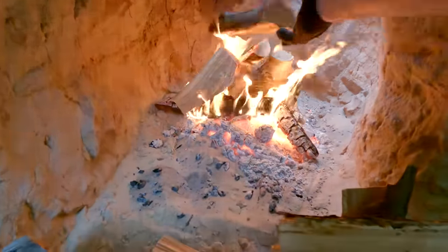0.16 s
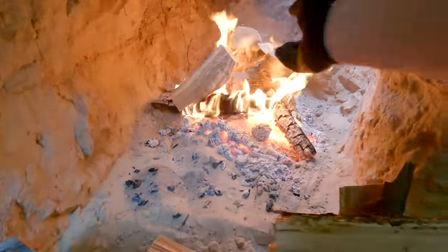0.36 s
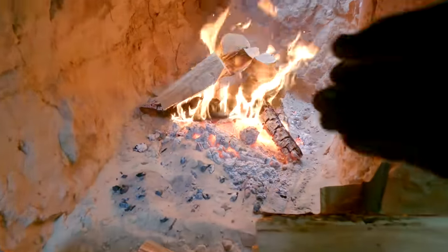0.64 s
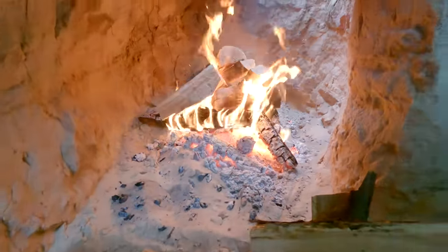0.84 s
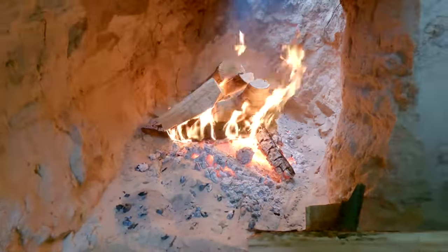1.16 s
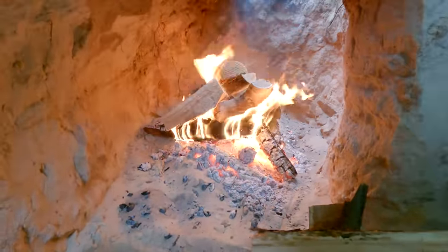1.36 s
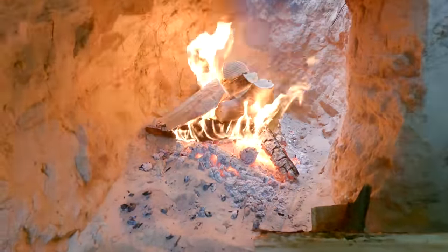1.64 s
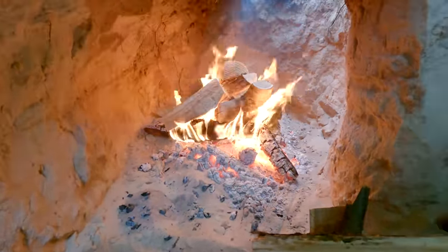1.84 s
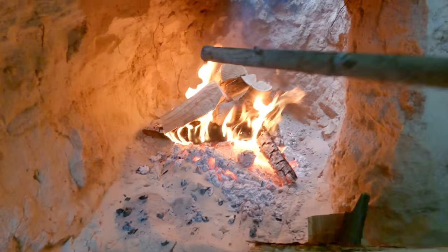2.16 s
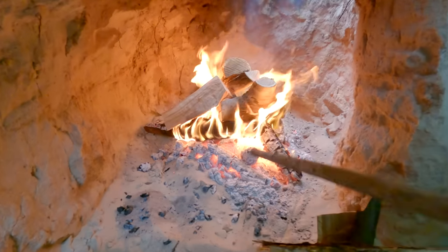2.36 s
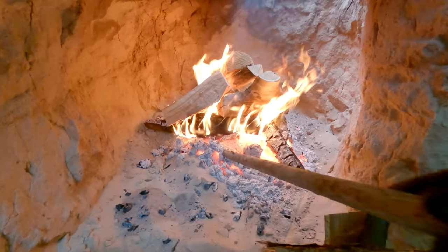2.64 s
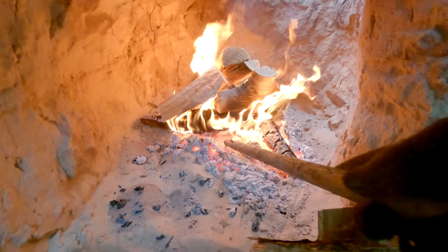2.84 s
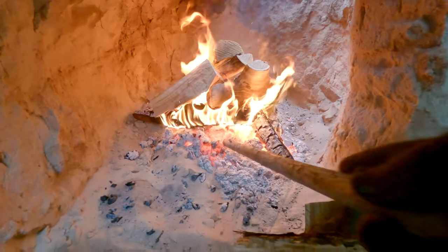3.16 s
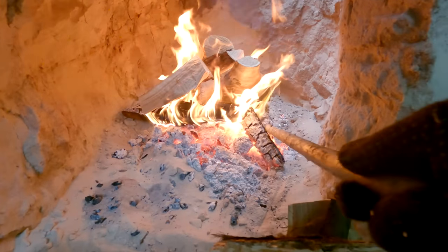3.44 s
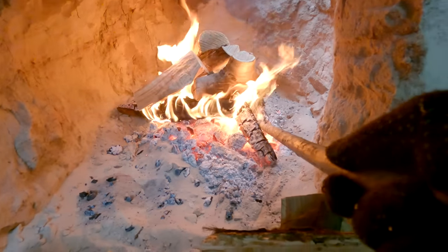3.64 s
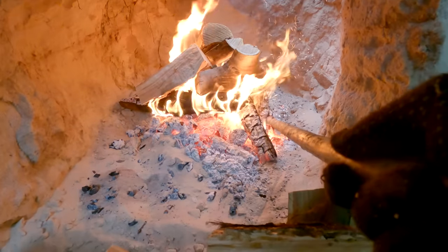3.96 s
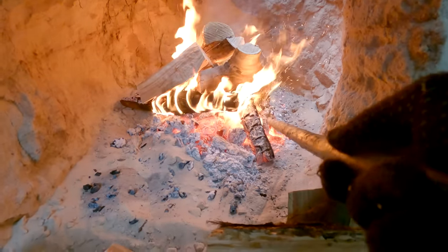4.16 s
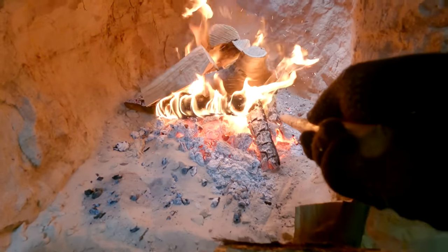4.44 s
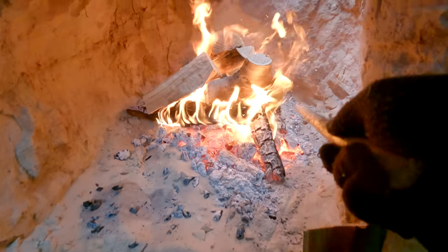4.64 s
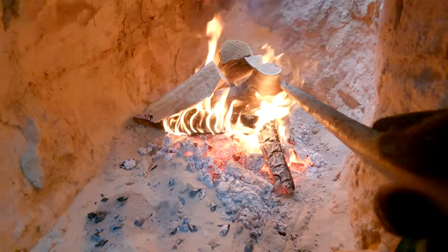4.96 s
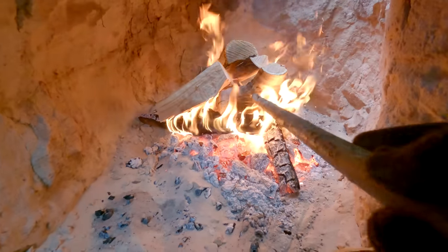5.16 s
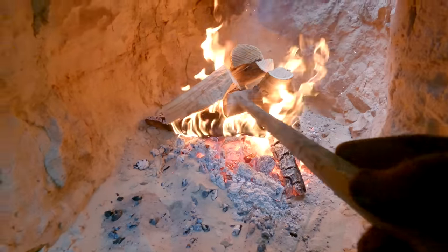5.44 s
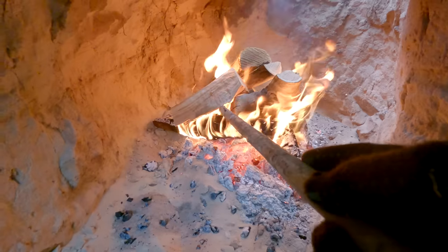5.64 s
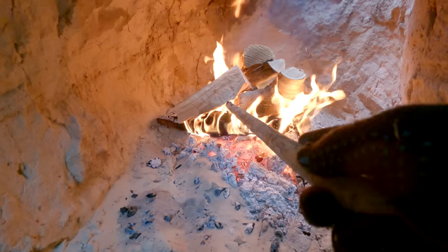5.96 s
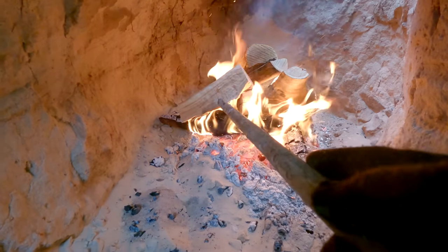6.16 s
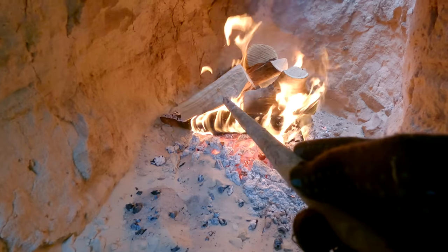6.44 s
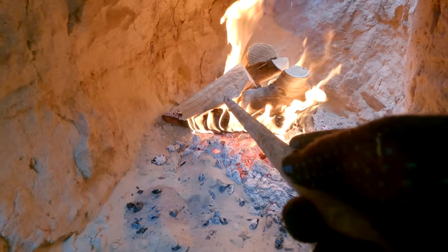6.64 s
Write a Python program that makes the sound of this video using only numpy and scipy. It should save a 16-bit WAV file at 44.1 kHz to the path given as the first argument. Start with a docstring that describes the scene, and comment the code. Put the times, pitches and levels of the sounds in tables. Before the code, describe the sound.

A wood fire burns in a clay fireplace, heard close to the hearth. Sharp, irregular pops and snaps sound over a low, fluttering flame rumble and a faint sizzle. Right at the start a log lands with a dull knock and a rasp of charcoal. Later a stick stirs the embers with small gritty scrapes and a few softer wooden knocks. Three puffs of burning gas thump low along the way, and the crackling continues to the end.

```python
"""A wood fire in a clay fireplace, one microphone close to the hearth.
From the start the flames rumble in the hollow, sap sizzles and wood cells burst as pops and snaps.
At 0.3 s a new log knocks down and charcoal rasps; near 1.9 s a puff of burning gas thumps the hearth.
Embers rustle as they are stirred with a stick, and from 3.7 to 4.8 s wood knocks on wood again.
Two stronger puffs come at 4.2 and 5.9 s, and the fire crackles on to the end."""
import sys
import numpy as np
from scipy import signal
from scipy.fft import rfft, irfft
from scipy.io import wavfile
from scipy.ndimage import uniform_filter1d

SR = 44100
rng = np.random.default_rng(int(sys.argv[2]) if len(sys.argv) > 2 else 0)


def master_out(mix):
    """Clip the mix to full scale and print it as 16-bit PCM to the path in sys.argv[1]."""
    frames = np.transpose(np.atleast_2d(mix))
    ceiling = np.clip(frames, -1, 1)
    pcm = np.round(ceiling * 32767).astype(np.int16)
    wavfile.write(sys.argv[1], SR, pcm)


N = 299880


def pops():
    """Wood cells burst with a snap, the split wood rings, and a wash returns from the clay walls."""
    # bursting wood cells; the three bands are relative to 3200 Hz: (time [s], nominal peak [dB],
    # body at 500 Hz [dB], wood at 1400 Hz [dB], edge at 7500 Hz [dB], ring of the split wood [Hz])
    bursts = [(0.033, -43, -32, -12, -6, 1420), (0.131, -34, -29, -16, -15, 2800),
              (0.159, -37, -31, -16, -13, 3120), (0.29, -18.5, -1, -21, -23, 2220),
              (0.324, -28.5, -28, -23, -30, 1930), (0.35, -17.5, -40, -19, -36, 3630),
              (0.378, -20.5, -8, -36, -30, 3820), (0.45, -30.5, -19, -40, -29, 3720),
              (0.47, -30.5, -15, -29, -25, 2670), (0.609, -34, -30, -15, -13.5, 3240),
              (0.631, -32.5, -33, -14, -17, 1430), (0.664, -40.5, -24, -21, -6, 3620),
              (0.942, -39.5, -15, -21, -13, 1000), (0.953, -37.5, -8, -21, -15, 1120),
              (1.059, -47.5, -10, -15, 1, 7160), (1.099, -43, -8, -4, -2, 1290),
              (1.148, -39.5, -11, -8, -11, 1930), (1.245, -22, -14, -10, -13, 1300),
              (1.452, -40, -25, -16, -15, 1630), (1.514, -13, -21, -14, -18, 2780),
              (1.576, -12.5, -23, -2.5, -2, 4200), (1.608, -30, -17, -14, -23, 1310),
              (1.665, -37, -13, -26, -16.5, 7300), (1.785, -35.5, -27, -18, -14, 1160),
              (1.841, -22.5, -23, -24, -12.5, 7600), (1.854, -15, -22.5, -16.5, -13, 3780),
              (1.981, -41.5, -11, -6, -5, 1180), (2.006, -30, -15, -9.5, -12, 1510),
              (2.052, -25, -6.5, -12.5, -15.5, 3120), (2.132, -33.5, -16, -14.5, -19, 1270),
              (2.15, -37.5, -19, -14, -34, 2730), (2.224, -21, -19, -11, -12, 3900),
              (2.333, -21, -19.5, -17, -19.5, 2800), (2.422, -37.5, -39, -19, -22, 1620),
              (2.513, -13.5, -18, -13, -13, 5590), (2.568, -39, -25, -21, -31, 1650),
              (2.596, -41, -9, -18, -18, 1120), (2.735, -21, -14.5, -15, -12.5, 1260),
              (2.858, -36, -34, -13, -28, 2930), (3.033, -33, -18, -9, -7, 3400),
              (3.068, -32.5, -15, -14, -35, 1680), (3.325, -46, -21, -3, -35, 1090),
              (3.379, -24, -13.5, -8.5, -13.5, 3920), (3.424, -29.5, -18, -15, -10, 3700),
              (3.47, -35, -4, -15, -21, 1630), (3.503, -38, -15, -20, -17, 4080),
              (3.532, -28, -17, -12, -15, 2600), (3.538, -31.5, -18.5, -12, -10, 3770),
              (3.627, -26, -21, -17, -11.5, 6160), (3.67, -30.5, -5, -26, -18, 2360),
              (3.698, -25.5, -18, -7, -16, 2760), (3.711, -25.5, -20, -15, -19, 1100),
              (3.738, -20.5, -5, -7.5, -14, 1030), (3.797, -31.5, -15, -15, -16.5, 1110),
              (3.835, -40, -7, -9, -18, 1180), (3.854, -32.5, -8, -7, -16, 2460),
              (3.955, -18, -3, 2, -15, 1020), (3.961, -26, -19, -19, -6, 2750),
              (4.15, -21, 0, 0, -21, 1020), (4.172, -30.5, -4, -13, -21, 1710),
              (4.218, -12.5, -20.5, -11.5, -17.5, 2470), (4.238, -11, -16, -7, -25, 1360),
              (4.255, -26, -18, -11, -37, 2270), (4.266, -29.5, -10, -13, -22, 2430),
              (4.328, -28.5, -19, 2, -9, 1110), (4.429, -34.5, -35, 0, -3, 3360),
              (4.471, -36, -6, -12, -7, 3700), (4.681, -31, -0.5, -17, -32, 1160),
              (4.779, -20.5, -23, -21, -11, 2250), (4.791, -25, -10, -22, -8, 2150),
              (4.811, -12.5, -7.5, -7.5, -11, 3440), (4.893, -35.5, -12, -15, -31, 1050),
              (4.949, -21.5, -11, -7, -12.5, 1100), (4.969, -26.5, -17, -23, -14.5, 1860),
              (4.995, -31.5, -8, -9, -8, 3240), (5.088, -33.5, -13, -7, -15, 2100),
              (5.11, -29.5, -8.5, -6, -3.5, 3600), (5.181, -22, -10, -7, -16, 3400),
              (5.386, -27, -16, -40, -9, 6000), (5.524, -21.5, -11.5, 0, -10, 1130),
              (5.85, -10, -47, -8.5, -7, 2630), (5.937, -21.5, -26.5, -26, -13.5, 4940),
              (5.944, -22.5, -37, -16, -6.5, 3500), (5.975, -32, -45, -23, -13, 6870),
              (6.038, -38, -24, -19, -8, 4060), (6.062, -31.5, -24, -20, -27, 1350),
              (6.137, -38.5, -18, -39, -15, 1010), (6.193, -25.5, -11, -18, -16, 6100),
              (6.215, -11.5, -12.5, -13, -7, 1140), (6.334, -38.5, -19, -25, -4, 7400),
              (6.366, -18.5, -13.5, -11.5, -9.5, 2700), (6.432, -36.5, -31, -8, -9, 1160),
              (6.615, -32.5, -23, -38, -14, 5140), (6.629, -38, -12, -13, -13, 1000),
              (6.655, -24.5, -25, -14.5, -12.5, 5160), (6.736, -39.5, -24, -31, -13, 4090),
              (6.776, -31.5, -11, -20, -8, 3450)]
    # colour of the fireplace and microphone on every pop: (frequency [Hz], gain [dB])
    colour = [(90, -29.5), (200, 21), (500, 19.5), (800, 17.5), (950, 7.5), (1150, 14.5), (1700, 9.5),
              (2770, 0), (4000, 2), (5500, 4.5), (7500, 9), (9000, -1), (11500, -6.5), (13000, -16.5),
              (15500, -14.5)]
    split_t60_s, wall_t60_s, wall_db = .016, .075, -14
    lead_s, lead_db = .03, -19
    ring_q, crest_db = 6.0, 18   # crest: nominal peak above the pop's rms
    size = 4096
    out = np.zeros(N + size)
    age = np.arange(size) / SR - lead_s - .001   # the snap comes 1 ms after the listed time
    after, before = np.maximum(age, 0), np.minimum(age, 0)
    # a faint hiss swells, then rises quickly into the snap
    swell_in = np.maximum(np.exp(before / .0013), from_db(lead_db) * np.exp(before / .008))
    freqs = np.fft.rfftfreq(size, 1 / SR)
    for s, peak_db, body_db, wood_db, edge_db, hz in bursts:
        crack, spikes, wash = rng.standard_normal((3, size))
        snap = crack * from_db(4.0 * spikes - 60 * after / split_t60_s)
        tail = wash * from_db(wall_db - 60 * after / wall_t60_s)
        top_db = edge_db + 0.074 * (peak_db + 17.5)   # harder pops reach further into the treble
        tone = [(500, body_db), (1400, wood_db), (3200, 0), (7500, edge_db), (10000, top_db)]
        pop = shaped(shaped(swell_in * (snap + tail), tone), colour)
        resonance = 1 + 1.6 / (1 + 1j * ring_q * (freqs / hz - hz / (freqs + 1)))
        pop = irfft(rfft(pop) * resonance)
        start = round((s - lead_s) * SR)
        out[start:start + size] += from_db(peak_db - crest_db) * rms_one(pop)
    return out[:N]


def flames():
    """Turbulent burning: low noise that swells in the hearth's air resonance and flutters."""
    # strength of the flames: (time [s], level [dB])
    blaze = [(0.0, -24), (0.27, -25), (0.54, -24.5), (0.82, -28.5), (1.09, -28.5), (1.36, -28.5),
             (1.63, -28), (1.9, -28), (2.18, -29.5), (2.45, -28), (2.72, -29.5), (2.99, -24), (3.26, -30),
             (3.54, -26), (3.81, -25.5), (4.08, -25.5), (4.35, -24), (4.62, -30), (4.9, -25.5), (5.17, -29),
             (5.44, -26), (5.71, -30), (5.98, -28), (6.26, -26), (6.53, -24.5), (6.8, -31.5)]
    # spectrum of the rumble in the hearth: (frequency [Hz], relative level [dB])
    rumble = [(15, -32.5), (31, -4), (45, -7), (62, -2), (84, 3), (100, -2.5), (135, -6.5), (165, -12.5),
              (205, -26.5), (310, -33), (600, -47.5), (820, -60), (1000, -67.5), (1600, -67), (2600, -110)]
    roar = rms_one(shaped(rng.standard_normal(N), rumble))
    # the flow is steadier than plain noise: part of the chance beating is evened out
    beating = np.sqrt(uniform_filter1d(roar ** 2, size=4000) + .1)
    level_db = in_time(blaze)[0] + 3.26 * drift(rate_hz=4.2)
    return from_db(level_db) * rms_one(roar / np.sqrt(beating))


def gas_puffs():
    """Puffs of burning gas thump the air in the hollow of the hearth."""
    # ignitions: (time [s], peak [dB])
    puffs = [(1.853, -13.5), (4.238, -7.5), (5.851, -4)]
    return ring(puffs, hz=86, t60_s=0.087)


def log_knocks():
    """Wood knocks on wood, and the log rings dully in its few modes."""
    # blows on the log: (time [s], strength [dB])
    blows = [(0.289, -15), (3.737, -22), (3.955, -20), (4.152, -27.5), (4.235, -28.5), (4.81, -22.5)]
    # modes of the log: (frequency [Hz], gain [dB], t60 [s])
    modes = [(303.4, 0.5, 0.056), (380, -12, 0.084), (713, -24, 0.15), (1100, -38, 0.04)]
    struck = sum(from_db(db) * ring(blows, hz, t60_s) for hz, db, t60_s in modes)
    return signal.lfilter([.15], [1, -.85], struck)   # the soft contact takes off the treble


def charcoal_rasps():
    """Charcoal crumbles or is scraped: dense grit that swells and fades within a few ms."""
    # scrapes: (time [s], length [s], level [dB], dullness [dB])
    scrapes = [(0.289, 0.023, -46, -11), (0.319, 0.09, -36.5, 3.5), (0.397, .05, -48, 7),
               (0.444, 0.063, -53.5, 10.5), (2.818, 0.052, -47, -12.5), (3.061, 0.056, -42, -0.5),
               (3.495, 0.025, -47.5, -6), (3.729, 0.034, -44.5, 2), (4.131, 0.042, -46, -2),
               (4.2, 0.064, -51.5, -21), (4.769, 0.052, -42, -9), (4.948, 0.072, -52.5, -3),
               (5.338, 0.069, -49.5, 0), (6.184, 0.051, -47.5, -20), (6.734, .07, -57, -20)]
    gate, dull_db = np.zeros(N), np.zeros(N)
    for s, length_s, db, scrape_dull_db in scrapes:
        start, end = round(s * SR), round((s + length_s) * SR)
        gate[start:end] = from_db(db)
        dull_db[start:] = scrape_dull_db
    envelope = signal.lfilter([.004], [1, -.996], gate) * from_db(2.5 * drift(rate_hz=40))
    return envelope * grit(ticks_per_s=5000, hiss=1.0, dull_db=dull_db)


def embers():
    """Embers shift and sap sizzles: sparse grit that breathes under the fire."""
    # rustle of the ember bed: (time [s], level [dB], dullness [dB])
    bed = [(0.0, -63.5, 13), (0.17, -61.5, -6), (0.34, -66, 3), (0.51, -54.5, 5), (0.68, -61.5, 4),
           (0.85, -66, 3), (1.02, -68, -5), (1.19, -66.5, -2), (1.36, -74, -9), (1.53, -59, 1),
           (1.7, -63.5, 2), (1.87, -60.5, 1), (2.04, -63.5, 3), (2.21, -58, -3), (2.38, -63, -4),
           (2.55, -57, -8), (2.72, -65, 4), (2.89, -62, -7), (3.06, -62, 0), (3.23, -63.5, -11),
           (3.4, -57, 8), (3.57, -59, 5), (3.74, -55, 8), (3.91, -66, -4), (4.08, -67, 2),
           (4.25, -73.5, -16), (4.42, -57.5, 3), (4.59, -57.5, 6), (4.76, -69.5, -3), (4.93, -63.5, -2),
           (5.1, -60, 1), (5.27, -62, 11), (5.44, -58.5, 4), (5.61, -59, 9.5), (5.78, -57.5, -3),
           (5.95, -56, -9), (6.12, -59.5, -3), (6.29, -68, -16), (6.46, -62, 7), (6.63, -66, -3),
           (6.8, -56.5, -12)]
    level_db, dull_db = in_time(bed)
    envelope = from_db(level_db + 1.5 * drift(rate_hz=12))
    return envelope * grit(ticks_per_s=180, hiss=1.84, dull_db=dull_db)


def grit(ticks_per_s, hiss, dull_db):
    """Tiny uneven ticks in clumps over a hiss; dull_db lifts the lows against the highs about 2600 Hz."""
    # spectrum of rustling embers: (frequency [Hz], relative level [dB])
    rustle = [(410, -36), (700, 6), (818, 0), (1020, -5), (1270, -1.5), (3650, -4), (4920, -5),
              (7560, -3.5), (9070, -12.5), (14100, -24.5), (15700, -44)]
    chance = ticks_per_s * from_db(6.0 * drift(rate_hz=25)) / SR
    ticks = (rng.random(N) < chance) * rng.standard_normal(N)
    ticks *= from_db(3.5 * np.minimum(rng.exponential(1, N), 4))
    # each crumb rings for 20 cycles at a pitch set by its size
    crumb_hz = np.geomspace(2000, 11000, 12)
    crumb = rng.integers(0, len(crumb_hz), N)
    rings = 0
    for k, hz in enumerate(crumb_hz):
        r, w = from_db(-60 * hz / (20 * SR)), 2 * np.pi * hz / SR
        rings += signal.lfilter([np.sin(w)], [1, -2 * r * np.cos(w), r * r], ticks * (crumb == k) + 1e-18)
    mix = .7 * rms_one(ticks) + .7 * rms_one(rings) + hiss * rng.standard_normal(N)
    grains = rms_one(shaped(mix, rustle))
    low = signal.sosfilt(signal.butter(1, 2600, fs=SR, output="sos"), grains)
    return low * from_db(dull_db / 2) + (grains - low) * from_db(-dull_db / 2)


def ring(strikes, hz, t60_s):
    """Clicks at (time [s], level [dB]) set one damped mode ringing."""
    clicks = np.full(N, 1e-18)
    for s, db in strikes:
        clicks[round(s * SR)] += from_db(db)
    r, w = from_db(-60 / (t60_s * SR)), 2 * np.pi * hz / SR
    return signal.lfilter([0, np.sin(w)], [1, -2 * r * np.cos(w), r * r], clicks)


def drift(rate_hz):
    """A slow random wander of unit rms, smoothed above rate_hz."""
    r = np.exp(-2 * np.pi * rate_hz / SR)
    return rms_one(signal.lfilter([1], [1, -2 * r, r * r], rng.standard_normal(N + SR))[SR:])


def shaped(x, curve):
    """Filter by (frequency [Hz], gain [dB]) points joined on a log frequency axis."""
    hz, db = np.transpose(curve)
    freqs = np.maximum(np.fft.rfftfreq(len(x), 1 / SR), 1)
    gain_db = np.interp(np.log(freqs), np.log(hz), db)
    return irfft(rfft(x) * from_db(gain_db), len(x))


def in_time(rows):
    """The value columns of a (time [s], value, ..) curve at every sample."""
    s, *columns = np.transpose(rows)
    return [np.interp(np.arange(N) / SR, s, column) for column in columns]


def from_db(db):
    """Decibels to gain."""
    return 10 ** (np.asarray(db) / 20)


def rms_one(x):
    """Scale to unit rms."""
    return x / np.sqrt(np.mean(x ** 2) + 1e-20)


def scene():
    """The whole fire reaches one close microphone, which feeds both channels."""
    fire = pops() + flames() + gas_puffs() + log_knocks() + charcoal_rasps() + embers()
    return np.array([fire, fire])


def record(dry):
    """Peaks are rounded, a faint, independent treble hiss lies in each channel, and the top is cut."""
    ceiling, hiss_db, cutoff_hz = .7, -86, 15900
    rounded = ceiling * np.tanh(dry / ceiling)
    highpass = signal.butter(6, 12500, "high", fs=SR, output="sos")
    hiss = signal.sosfilt(highpass, from_db(hiss_db) * rng.standard_normal((2, N)))
    lowpass = signal.cheby2(16, 60, cutoff_hz, fs=SR, output="sos")
    return signal.sosfilt(lowpass, rounded + hiss)


dry = scene()
out = record(dry)
master_out(out)
```